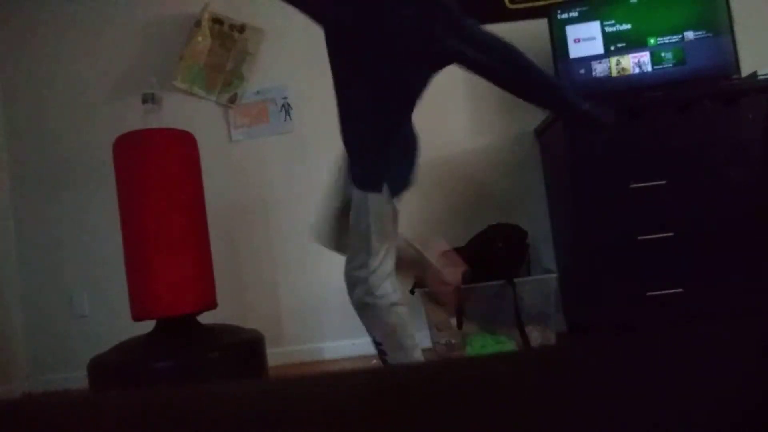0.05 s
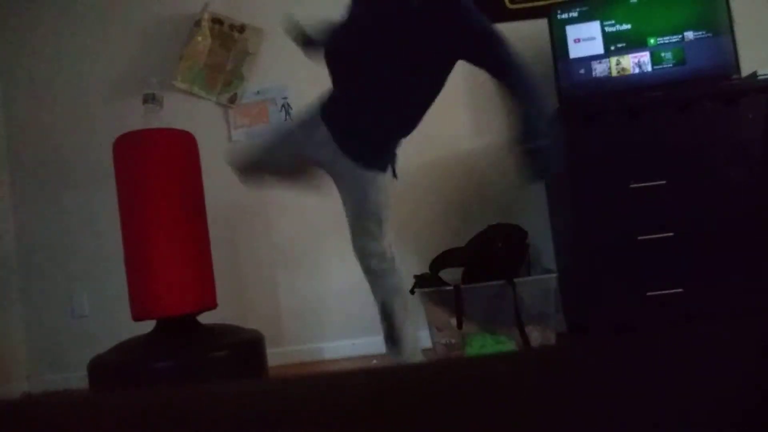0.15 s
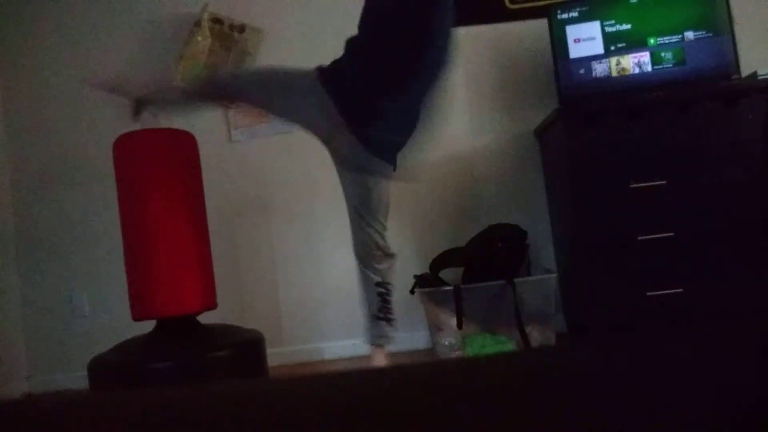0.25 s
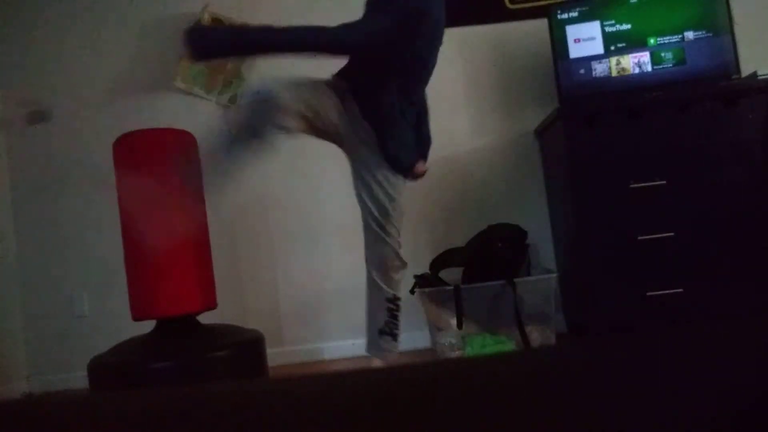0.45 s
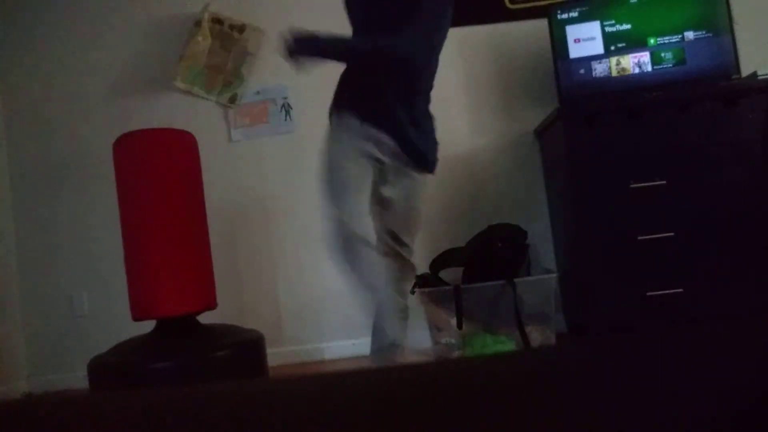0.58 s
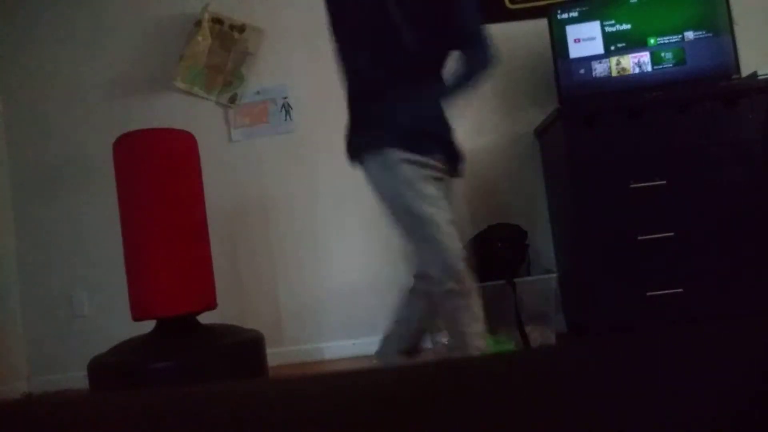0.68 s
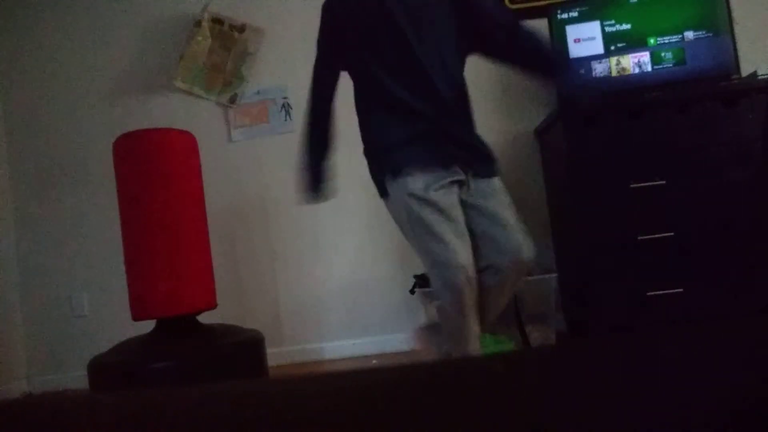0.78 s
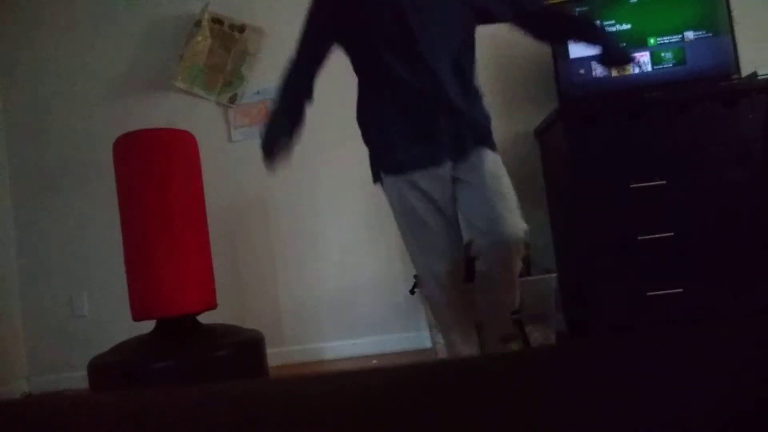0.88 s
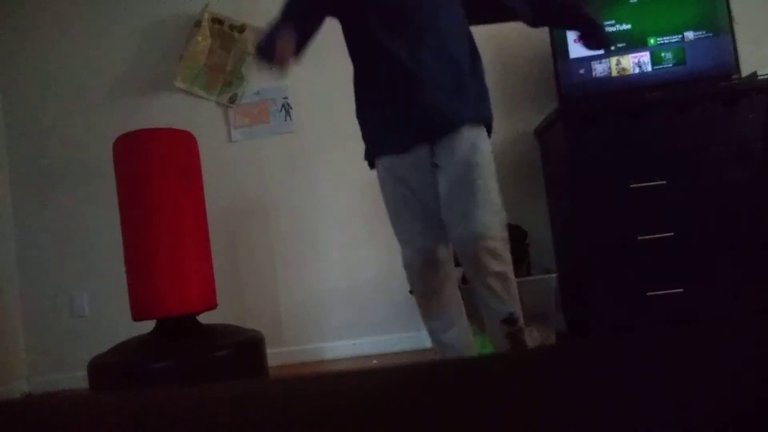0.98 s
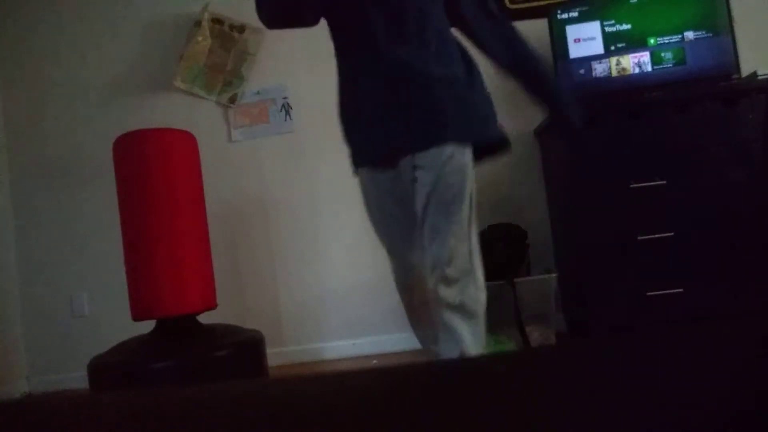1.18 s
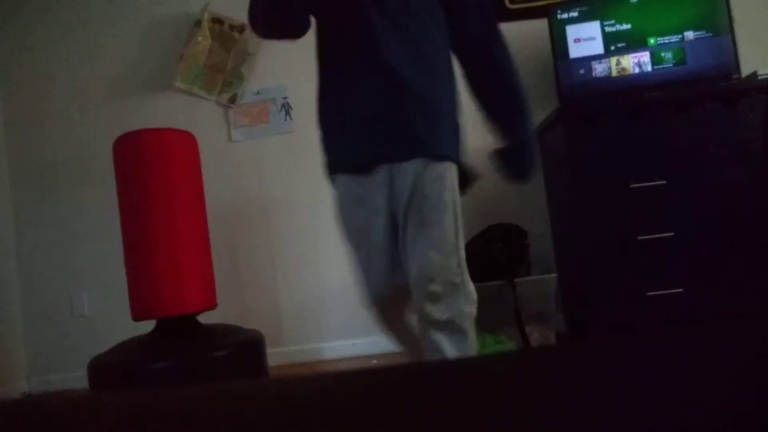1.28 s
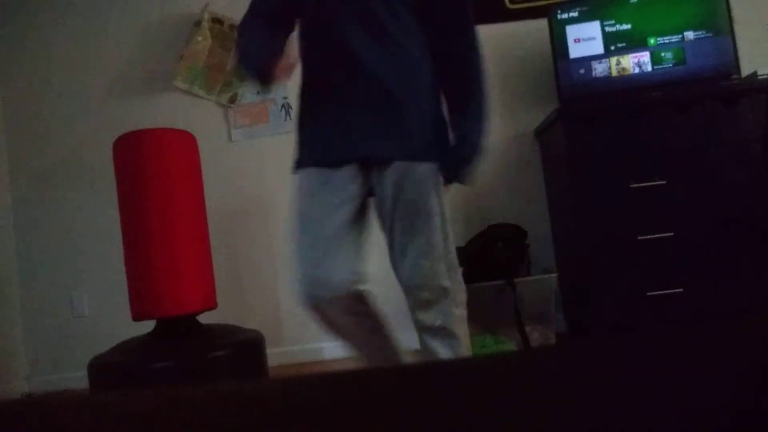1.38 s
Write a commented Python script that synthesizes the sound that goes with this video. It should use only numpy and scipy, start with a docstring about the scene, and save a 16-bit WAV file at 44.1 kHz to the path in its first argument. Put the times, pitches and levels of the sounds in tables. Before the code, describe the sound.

A plastic bottle is kicked with a sharp crack, then slams onto the floor.

```python
"""A shoe squeaks as it pivots in a small, bare room, heard on one microphone across the floor.
A spinning kick cracks a plastic bottle off the top of a punching bag; its thin shell buckles and rings.
The foot comes down, then the bottle slams onto the floor and skitters away while clothes rustle.
The walls answer each contact, and both big blows overload the recorder's limiter."""
import sys
import numpy as np
from scipy import signal
from scipy.fft import rfft, irfft, next_fast_len
from scipy.io import wavfile
from scipy.ndimage import uniform_filter1d, minimum_filter1d, map_coordinates

SR = 44100
rng = np.random.default_rng(int(sys.argv[2]) if len(sys.argv) > 2 else 0)


def digitize_waveform(pressure):
    """Quantize a signal to 16-bit integers and store it at the path in sys.argv[1].

    Rows of a 2-D input are taken as channels; values are limited to [-1, 1].
    """
    field = np.atleast_2d(pressure).T
    bounded = np.clip(field, -1, 1)
    quanta = np.round(bounded * 32767).astype(np.int16)
    wavfile.write(sys.argv[1], SR, quanta)


N = 63945
T = np.arange(N) / SR


# the shell buckles and springs back under the foot (delay [s], relative level [dB])
KICK_BUCKLES = [(.012, -2.5), (.05, -10.5)]
# the crack of thin plastic (frequency [Hz], relative level [dB])
CRACK_SPECTRUM = [(100, -40), (300, -21), (600, -16.5), (900, -5.5), (1150, -9.5), (1400, -6), (1900, -11),
                  (2600, -10), (3500, -9.5), (4150, 0.5), (5500, 0.5), (6800, -7.5), (8000, -13),
                  (9500, -21.5), (12000, -26.5), (15500, -30)]
# the shell's ring (frequency [Hz], relative level [dB])
SHELL_MODES = [(856, -55), (1400, -33), (3192, -33), (4102, -41), (4298, -22), (4341, -37), (4479, -37),
               (4538, -53), (5147, -26), (5325, -45), (5466, -38), (5690, -25)]
# the slap on the bag (frequency [Hz], relative level [dB])
BAG_SPECTRUM = [(50, -20), (120, -17.5), (220, -12), (450, -6.5), (750, 0), (1000, 5), (1400, -7.5),
                (2200, -5.5), (4000, -15), (15500, -47)]

def kick(start_s=0.2385):
    """Up on the bag: the foot cracks the bottle, which buckles and rings, then slaps the bag in passing."""
    hit = contact(start_s, 0, rise_s=0.0015)
    buckles = sum(contact(start_s + delay, db, rise_s=0.0013) for delay, db in KICK_BUCKLES)
    crack = coloured(hit + buckles, CRACK_SPECTRUM)
    shell = at(start_s, ring(SHELL_MODES, t60_s=0.54, waver_hz=7.7, attack_s=0.008))
    bag = coloured(contact(0.266, db=-20, rise_s=0.002), BAG_SPECTRUM)
    return amp(-8.5) * (crack + amp(-9) * shell) + bag


# the shell buckles and springs back on the floor (delay [s], relative level [dB])
LANDING_BUCKLES = [(.017, -3), (.044, -2)]
# bottle and floor colliding (frequency [Hz], relative level [dB])
SLAM_SPECTRUM = [(59, -53), (100, -30), (238, -24), (293, -12), (378, -9.5), (487, -1), (601, -2), (998, 0),
                 (1180, -4), (1520, -3.5), (1620, -7), (2690, -10), (3050, -9.5), (5280, -6.5), (6950, -11),
                 (9740, -27.5), (15500, -35)]
# the knock that rings on (frequency [Hz], relative level [dB])
KNOCK_MODES = [(215, -44.5), (292, -42.5), (330, -46), (477, -35), (511.5, -34.5), (565, -34), (704, -29.5),
               (756.5, -27), (796.5, -29), (815, -34), (885.5, -37), (941, -32.5), (1031, -29), (1110, -29),
               (1491, -32.5), (1733, -32.5)]
# the floor's first dull push (frequency [Hz], relative level [dB])
THUD_SPECTRUM = [(120, -36), (400, -21.5), (600, -5.5), (1000, 1), (1500, -15.5), (2300, -26), (15500, -48)]

def landing(start_s=0.7729):
    """Down on the floor: the bottle slams in with a thud and a hollow knock."""
    hit = contact(start_s, 0, rise_s=0.0026)
    buckles = sum(contact(start_s + delay, db, rise_s=0.0016) for delay, db in LANDING_BUCKLES)
    slam = coloured(hit + buckles, SLAM_SPECTRUM)
    knock = at(start_s, ring(KNOCK_MODES, t60_s=0.53, waver_hz=1.86, attack_s=0.0036))
    push = amp(-7) * rng.standard_normal(N) * decay(t60_s=0.092)
    thud = at(start_s, coloured(push, THUD_SPECTRUM))
    return amp(-9.5) * (slam + amp(-3) * knock) + thud


# the bottle taps the floor (time [s], level [dB])
BOTTLE_TAPS = [(1.110, -45.5), (1.146, -47), (1.226, -42.5), (1.234, -37), (1.372, -45.5)]
# a light tap of plastic (frequency [Hz], relative level [dB])
TAP_SPECTRUM = [(100, -34), (250, -10), (600, 4.5), (1300, 3), (2000, -0.5), (2700, 3), (3400, 0.5),
                (5000, 2.5), (8000, -3.5), (9500, -8.5), (15500, -25)]
# a thin hiss among the taps (frequency [Hz], relative level [dB])
HISS_SPECTRUM = [(3000, -37), (6500, -17), (7500, -2), (7900, 7), (8400, -17), (10000, -12), (15500, -24)]

def skitter(hiss_s=1.17, hiss_width_s=0.06):
    """Faint at the microphone: the fallen bottle taps along the floor with a brief hiss."""
    swell = np.exp(-((T - hiss_s) / hiss_width_s) ** 2)
    hiss = amp(-47) * swell * noise(HISS_SPECTRUM)
    taps = sum(contact(s, db, rise_s=0.001) for s, db in BOTTLE_TAPS)
    return coloured(taps, TAP_SPECTRUM) + hiss


# the foot lands, ball then heel (time [s], level [dB])
STEP_CONTACTS = [(.631, -44), (0.645, -37.5)]
# the sole's dull pat (frequency [Hz], relative level [dB])
STEP_SPECTRUM = [(130, -18), (170, -1), (260, -8), (400, -8), (750, -2), (1300, -6), (2000, -14.5),
                 (3500, -24), (5000, -10.5), (9000, -29), (15500, -41)]
# the floorboards' ring (frequency [Hz], relative level [dB])
BOARD_MODES = [(165, -11), (255, 0), (400, -2), (612, -3), (760, -1), (985, 2), (1175, 1)]

def footfall():
    """Beside the bag: the kicking foot comes down softly and sets the floorboards ringing."""
    boards = at(STEP_CONTACTS[0][0], ring(BOARD_MODES, t60_s=0.19, waver_hz=9.8, attack_s=0.0066))
    pats = sum(contact(s, db, rise_s=0.01) for s, db in STEP_CONTACTS)
    return coloured(pats, STEP_SPECTRUM) + amp(-36) * boards


# the sole squeaks on the floor (frequency [Hz], relative level [dB])
SQUEAK_TONES = [(1770, -52), (2536, -50), (3515, -50), (3790, -48), (4802, -54), (5593, -52), (6471, -60)]
# the sole's scuff (frequency [Hz], relative level [dB])
SCUFF_SPECTRUM = [(100, -21), (250, -10.5), (550, -7), (1000, 3), (1400, -4), (2500, 0), (3200, -1.5),
                  (4500, -1), (6000, -3), (7800, -14.5), (9500, -29), (15500, -31)]

def pivot(waver_hz=20.3, low_rise_s=0.04):
    """At floor level: the standing foot twists with a scuff and a rough squeak, its low note late."""
    def tone(hz, db):
        pitch_hz = hz + waver_hz * wobble(148)
        return amp(db + wobble(66)) * np.sin(2 * np.pi * np.cumsum(pitch_hz) / SR)

    high = amp(4.5) * sum(tone(hz, db) for hz, db in SQUEAK_TONES) * decay(t60_s=0.49, hold_s=0.03)
    low_onset = np.minimum(T / low_rise_s, 1) ** 3
    low = tone(hz=790, db=-40) * low_onset * decay(t60_s=0.21, hold_s=0.07)
    scuff = amp(-38) * noise(SCUFF_SPECTRUM) * decay(t60_s=0.6, hold_s=0.029)
    return high + low + scuff


# the swish follows the body's motion (time [s], level [dB])
SWISH_LEVELS = [(0, -61), (.12, -54), (.18, -50), (.23, -44.5), (.4, -58), (.6, -54), (.7, -49.5),
                (.77, -50), (1.05, -42), (1.18, -40.5), (1.3, -45.5), (1.45, -47)]
# rubbing cloth (frequency [Hz], relative level [dB])
CLOTH_SPECTRUM = [(100, -35.5), (300, -4.5), (800, 2), (1400, 0), (2400, -10.5), (3400, -5.5), (4300, 2),
                  (6200, -1.5), (8000, -5), (9500, -21), (15500, -22)]

def clothes():
    """Well under the blows: loose cloth rustles unevenly on the turning body."""
    swish_db = np.interp(T, *np.transpose(SWISH_LEVELS))
    flutter_db = 2.4 * wobble(39.5)
    return amp(swish_db + flutter_db) * noise(CLOTH_SPECTRUM)


# the room's quiet air (frequency [Hz], relative level [dB])
AIR_SPECTRUM = [(25, -38), (80, -49), (160, -16), (300, -5), (550, 1.5), (850, 4), (1500, -1.5),
                (2500, -11.5), (5000, -9.5), (9000, -49), (15500, -40)]

def room_tone():
    """All around the microphone: a faint, steady hush."""
    return amp(-48.5) * noise(AIR_SPECTRUM)


# reverberation of the bare room (frequency [Hz], time to fall 60 dB [s])
ROOM_T60 = [(80, 0.14), (200, 0.39), (500, 0.52), (1300, 0.6), (3000, 0.56), (5000, 0.56), (9000, 0.48),
            (15000, 0.37)]

def contact(start_s, db, rise_s):
    """A contact from a distance: a short direct burst and the room's answer, longest in the mids."""
    hz, t, bands = signal.stft(rng.standard_normal(N), SR, nperseg=256)
    fading = amp(-60 * t / along(ROOM_T60, hz)[:, None])
    answer = signal.istft(bands * fading, SR, nperseg=256)[1][:N]
    direct = amp(1) * decay(t60_s=0.032) * rng.standard_normal(N)
    attack = 1 - np.exp(-T / rise_s)
    return amp(db) * at(start_s, (direct + answer) * attack)


def ring(modes, t60_s, waver_hz, attack_s):
    """A struck body's modes fade together, each a little unsteady in pitch."""
    tones = np.zeros(N)
    for hz, db in modes:
        cycles = rng.random() + np.cumsum(hz + waver_hz * wobble(60)) / SR
        tones += amp(db) * np.sin(2 * np.pi * cycles)
    return unit(tones) * decay(t60_s) * (1 - np.exp(-T / attack_s))


def coloured(x, spectrum):
    """Causal filter of unit power gain that falls away below the spectrum's first point."""
    size = 2 * next_fast_len(N)
    hz = np.fft.rfftfreq(size, 1 / SR)
    low_cut = np.minimum(hz / spectrum[0][0], 1) ** 3
    gain = unit(amp(along(spectrum, hz)) * low_cut)
    cepstrum = irfft(np.log(np.maximum(gain, 1e-6)))
    cepstrum[1:size // 2] *= 2  # minimum phase: nothing sounds before the hit
    cepstrum[size // 2 + 1:] = 0
    return irfft(rfft(x, size) * np.exp(rfft(cepstrum)))[:N]


def noise(spectrum):
    """Steady coloured noise of rms 1."""
    return unit(coloured(rng.standard_normal(N), spectrum))


def decay(t60_s, hold_s=0):
    """Hold at 1, then fall 60 dB every t60_s."""
    return amp(-60 * np.maximum(T - hold_s, 0) / t60_s)


def wobble(rate):
    """A smooth random curve, rate knots a second."""
    return map_coordinates(rng.standard_normal(400), [T * rate], mode="wrap")


def along(points, hz):
    """Read (frequency, value) points on a log axis."""
    knots_hz, values = np.transpose(points)
    return np.interp(np.log(hz + 1), np.log(knots_hz + 1), values)


def at(start_s, x):
    """Delay x to begin at start_s."""
    return np.pad(x, (round(start_s * SR), 0))[:N]


def amp(db):
    """Decibels to gain."""
    return 10 ** (np.asarray(db) / 20)


def unit(x):
    """Scale to rms 1."""
    return x / np.sqrt(np.mean(x ** 2) + 1e-20)


def scene():
    """Everything that reaches the one microphone."""
    return (pivot() + kick() + footfall() + landing() + skitter() + clothes() + room_tone())[None]


def record(dry):
    """The recorder: a limiter ducks each peak at once and recovers quickly, then the top treble is cut."""
    ceiling, release_db_per_s, top_hz = 0.675, 454, 15900
    look_ahead = int(0.00023 * SR)
    needed_db = np.minimum(0, 20 * np.log10(ceiling / (np.abs(dry) + 1e-9)))
    held_db = minimum_filter1d(needed_db, look_ahead)
    recovery_db = release_db_per_s * T
    gain_db = np.minimum.accumulate(held_db - recovery_db, axis=-1) + recovery_db
    limited = dry * amp(uniform_filter1d(gain_db, look_ahead))
    size = 2 * next_fast_len(N)
    passband = np.fft.rfftfreq(size, 1 / SR) < top_hz
    return irfft(rfft(limited, size) * passband, size)[..., :N]


dry = scene()
out = record(dry)
digitize_waveform(out)
```